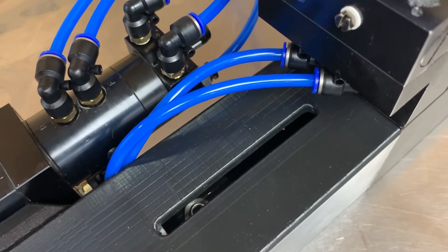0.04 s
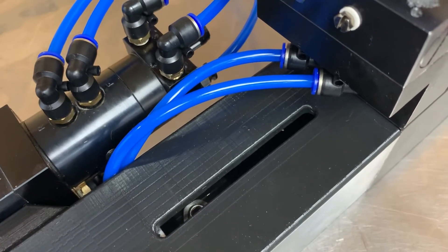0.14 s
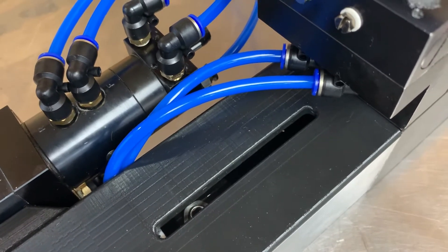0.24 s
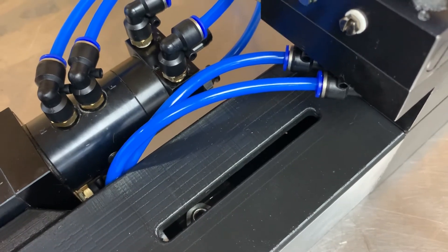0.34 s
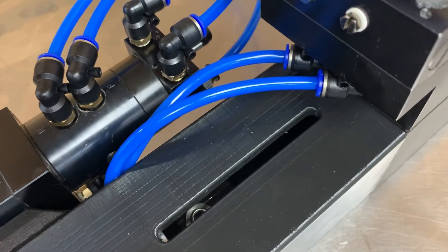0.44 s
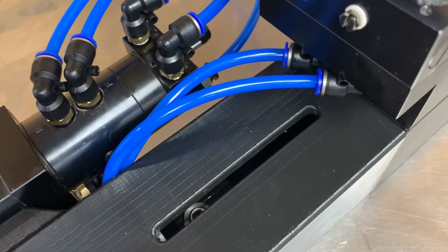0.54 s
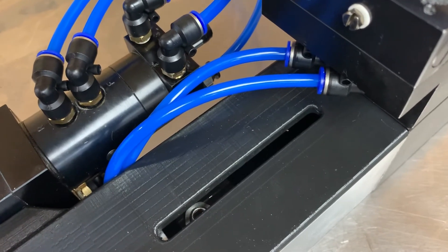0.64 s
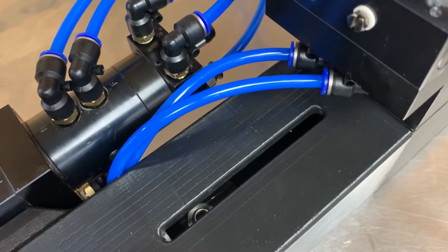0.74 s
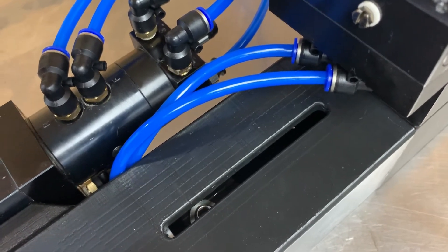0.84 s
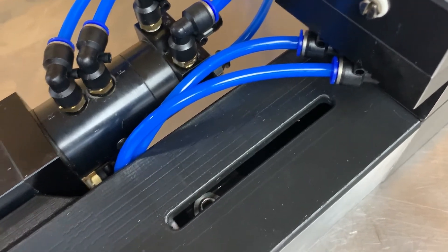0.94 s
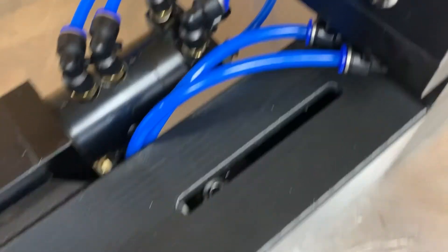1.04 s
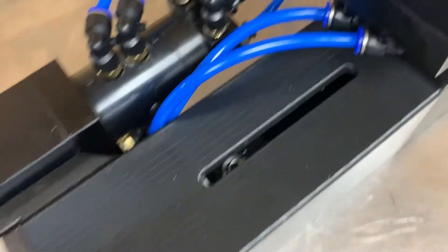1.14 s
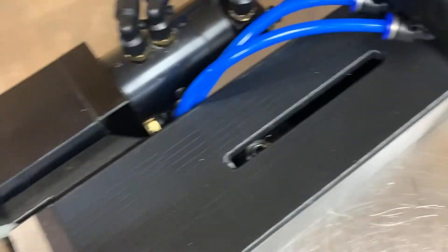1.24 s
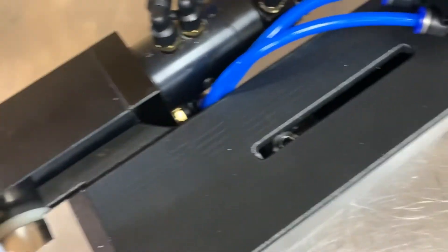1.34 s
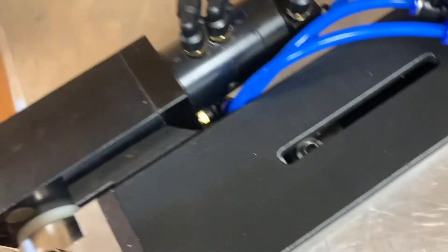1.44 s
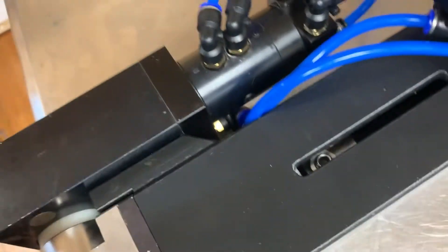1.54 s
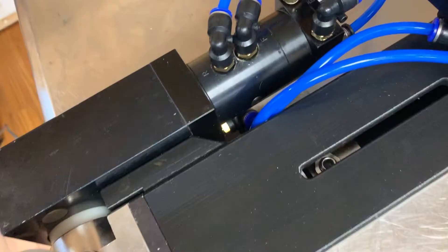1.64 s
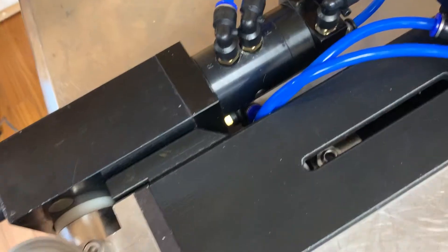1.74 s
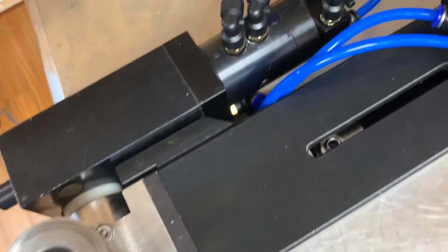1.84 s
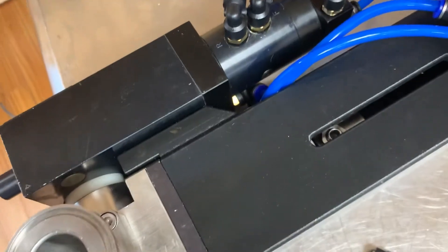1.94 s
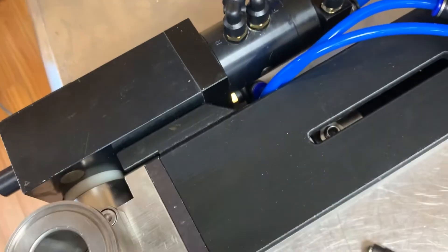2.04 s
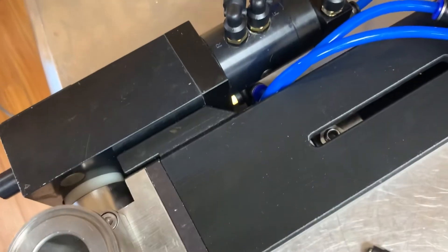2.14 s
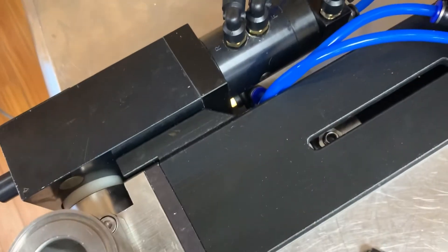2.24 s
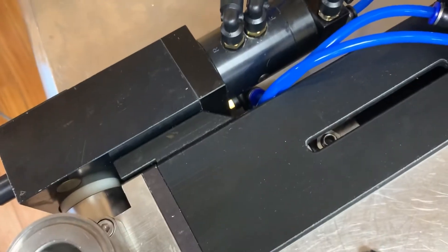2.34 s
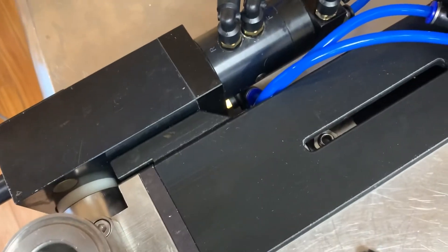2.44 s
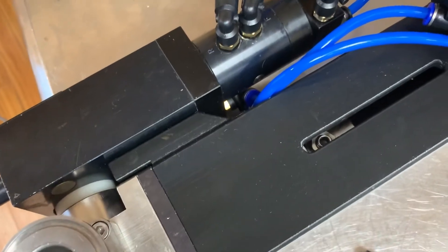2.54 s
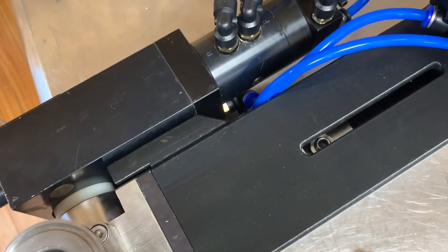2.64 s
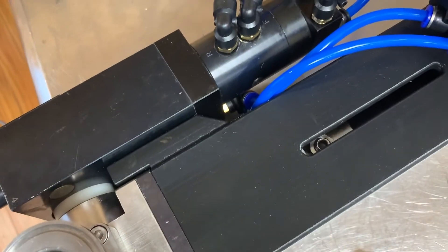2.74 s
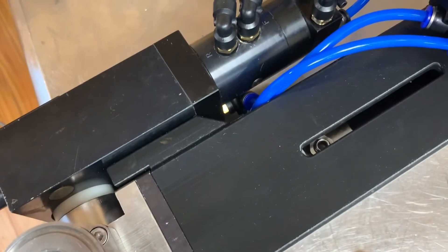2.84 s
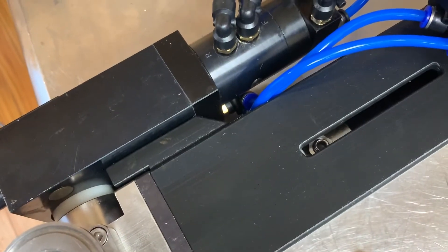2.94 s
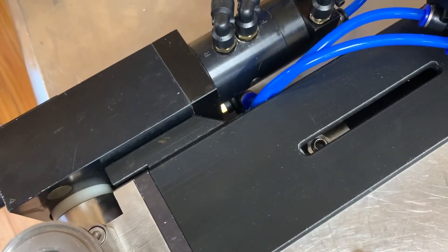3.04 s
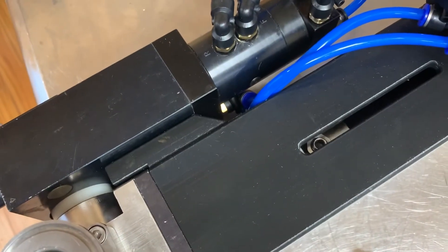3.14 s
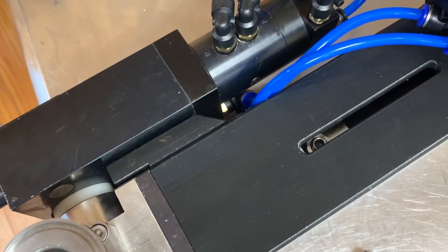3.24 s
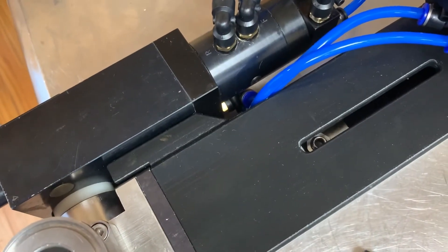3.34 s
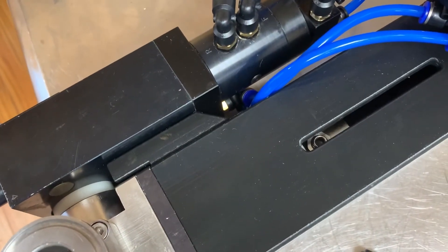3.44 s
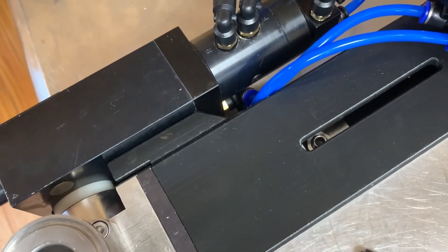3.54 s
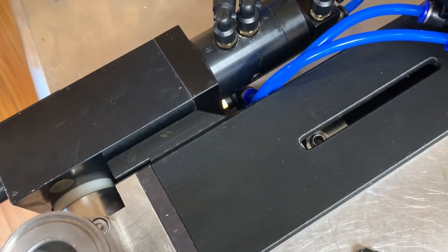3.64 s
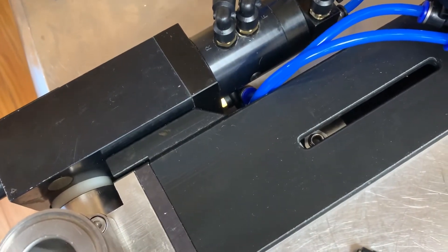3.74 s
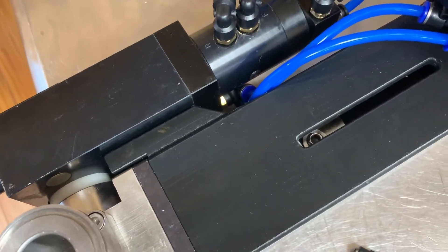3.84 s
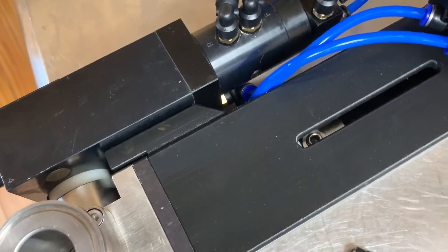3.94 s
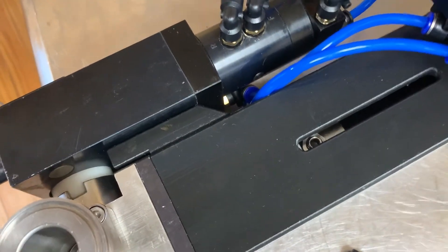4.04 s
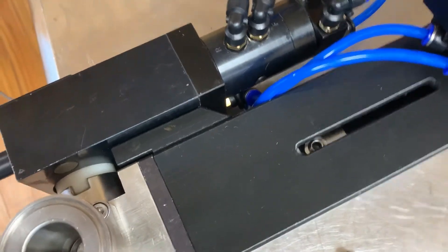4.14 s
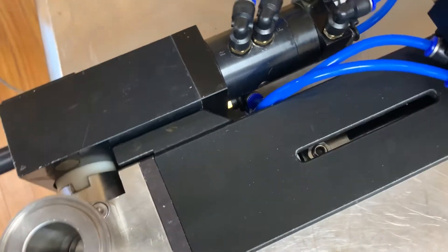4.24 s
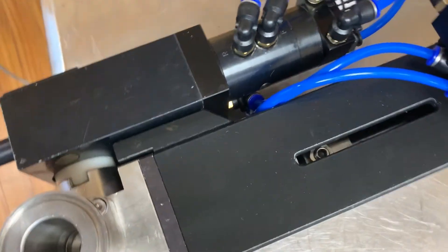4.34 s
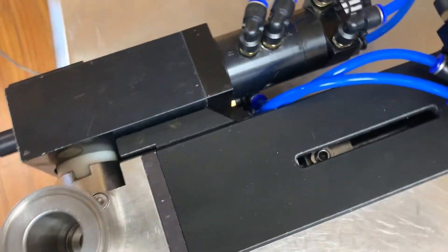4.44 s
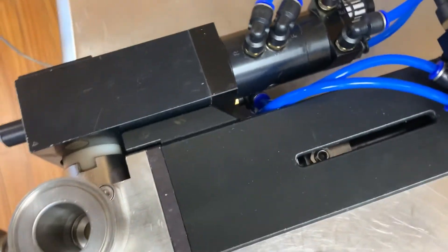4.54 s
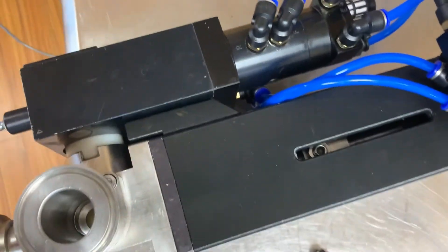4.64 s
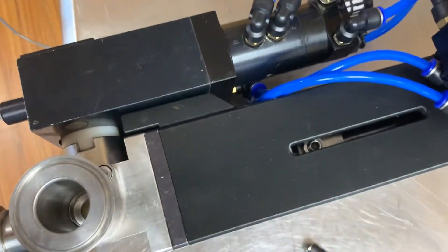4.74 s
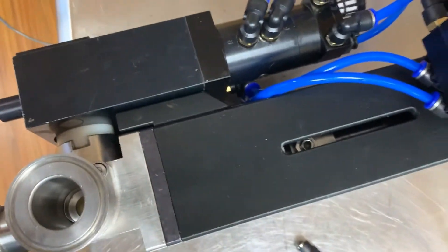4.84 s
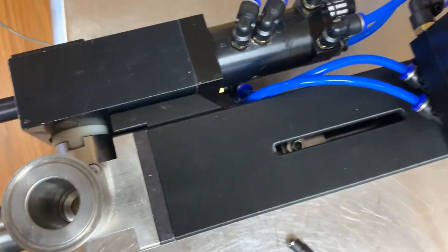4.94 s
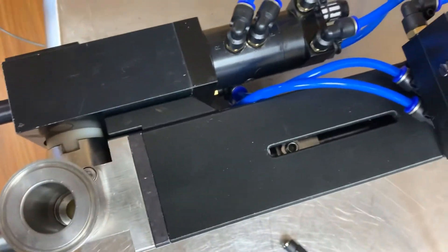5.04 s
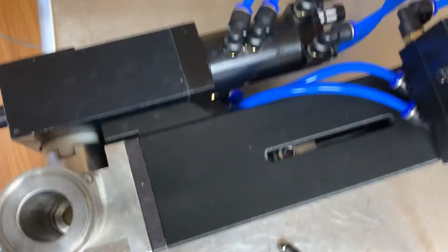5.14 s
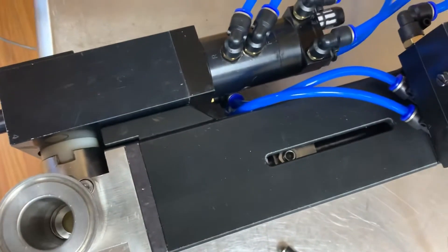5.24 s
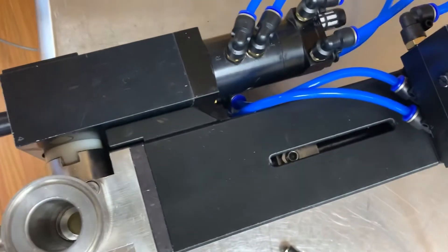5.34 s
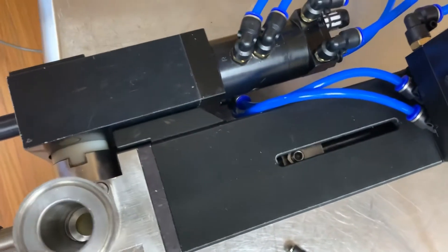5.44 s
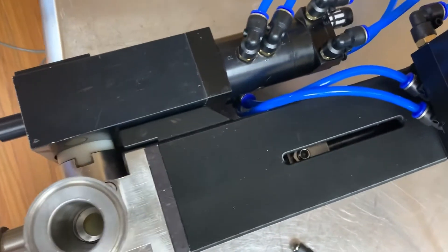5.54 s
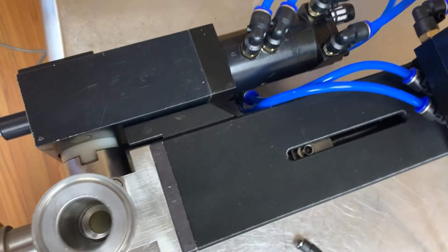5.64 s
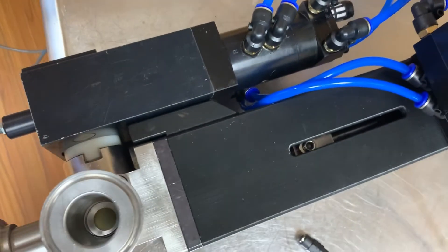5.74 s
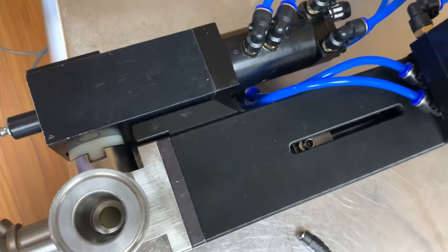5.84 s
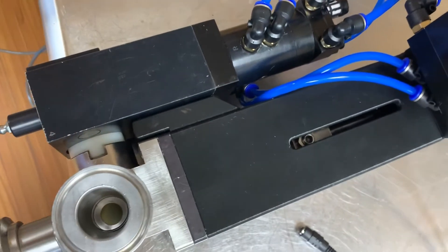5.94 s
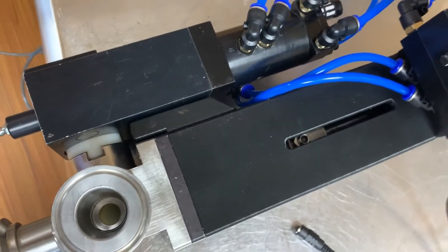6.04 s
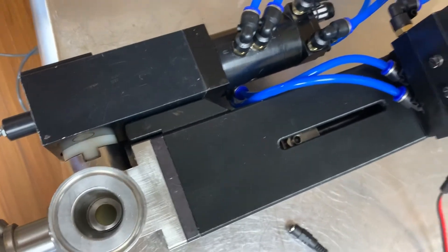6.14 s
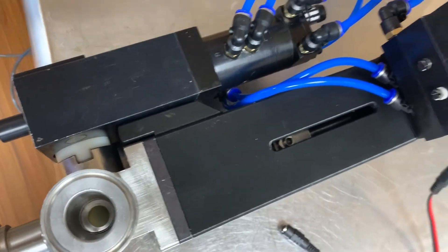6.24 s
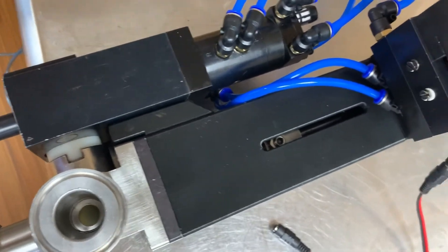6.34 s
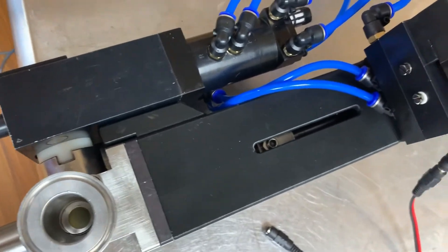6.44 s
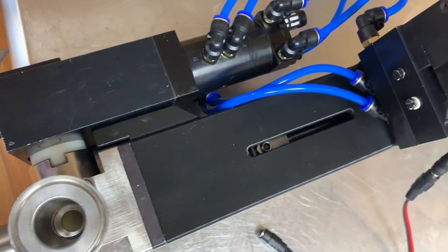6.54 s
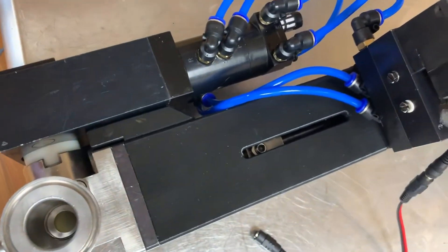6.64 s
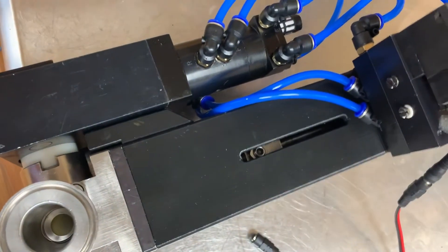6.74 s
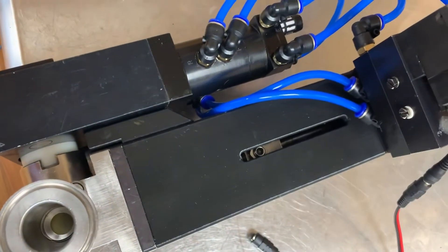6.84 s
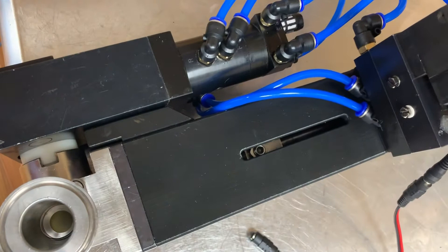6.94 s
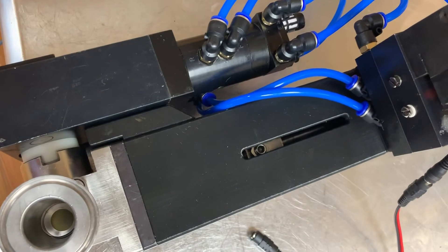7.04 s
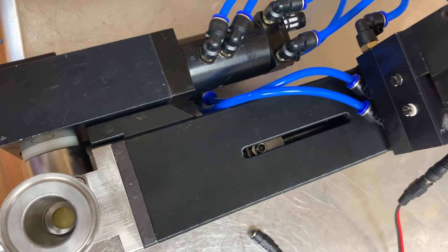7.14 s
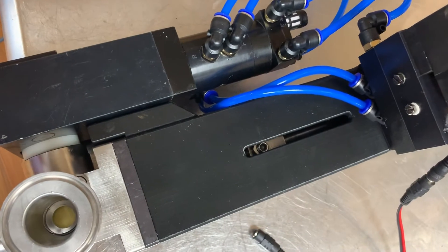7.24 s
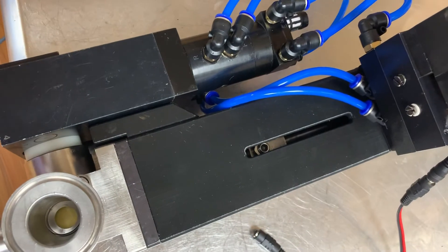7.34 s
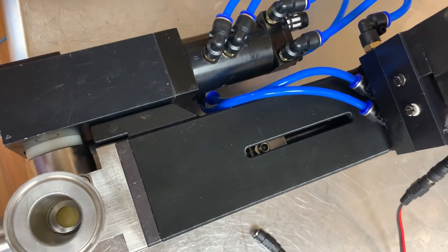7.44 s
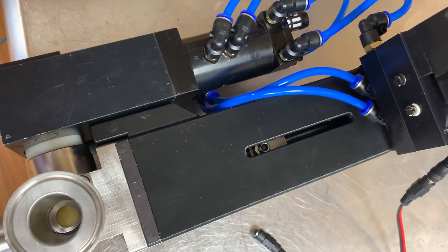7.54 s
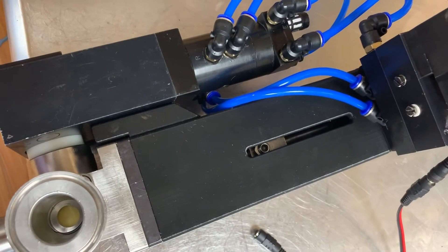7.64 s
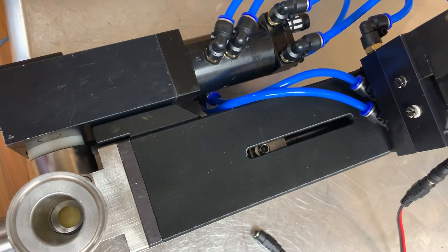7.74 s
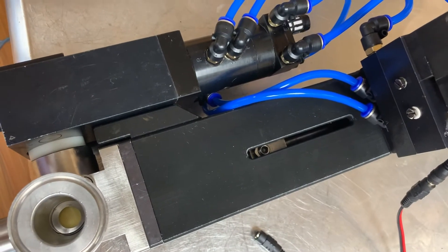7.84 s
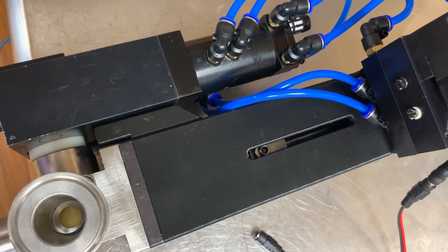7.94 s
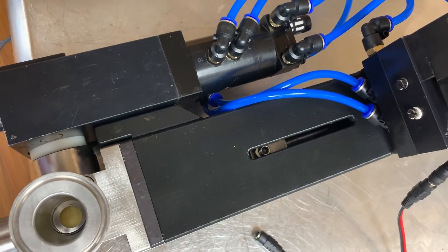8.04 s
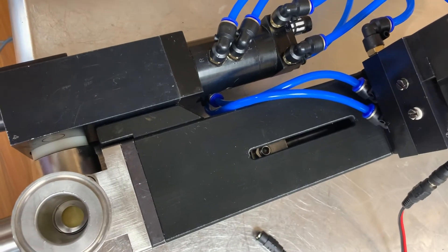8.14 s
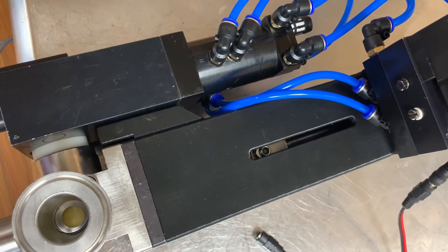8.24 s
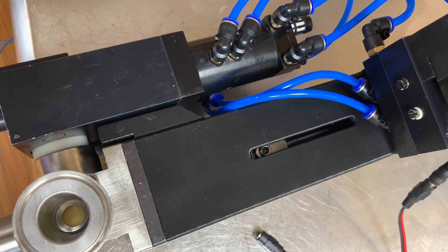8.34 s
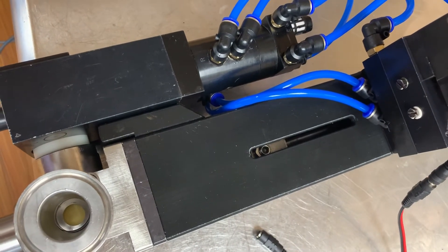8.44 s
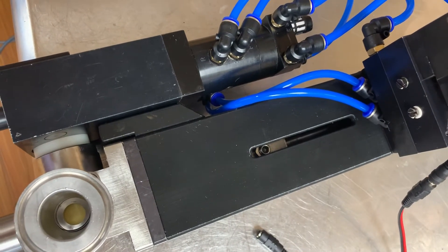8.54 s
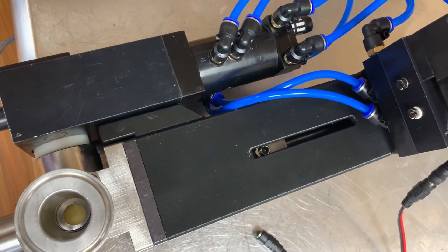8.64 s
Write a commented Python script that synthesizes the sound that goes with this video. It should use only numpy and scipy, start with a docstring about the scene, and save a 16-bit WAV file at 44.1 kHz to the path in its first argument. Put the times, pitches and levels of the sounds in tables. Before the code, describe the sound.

A pneumatic actuator switches three times with sharp double metal clacks and short air blasts, with bright leaking hiss and hollow exhaust between.

```python
"""Pneumatic actuator in a factory hall

An actuator on a filling machine switches stroke three times, over the low rumble of the hall.
Each switch is valve ticks, a blast of air noise and ringing, pitch-sweeping hits of spool and piston; knocks follow.
Between switches a fitting leaks a bright hiss of gliding noise, or the cylinder exhausts hollowly through tubing.
The microphone has two ports and draws back from close to far, which recolours the leak.
"""
import sys
import numpy as np
from scipy import signal
from scipy.fft import rfft, irfft, next_fast_len
from scipy.io import wavfile
from scipy.ndimage import map_coordinates

SR = 44100
rng = np.random.default_rng(int(sys.argv[2]) if len(sys.argv) > 2 else 0)


def volts_from_decibels(level):
    """Turn decibel levels (scalar or array-like) into linear amplitude factors."""
    exponent = np.asarray(level, float) / 20
    return 10 ** exponent


def materialize(psi):
    """Save the field psi as 16-bit PCM at rate SR to the path in sys.argv[1].

    A 1-D psi becomes a single channel; in a 2-D psi each row is a channel.
    """
    bounded = np.clip(np.atleast_2d(psi).T, -1, 1)
    quanta = np.round(bounded * 32767).astype(np.int16)
    wavfile.write(sys.argv[1], SR, quanta)


N = 383669
T = np.arange(N) / SR
SIZE = next_fast_len(N + SR)   # transform length, with room after the end
HZ = np.maximum(np.arange(SIZE // 2 + 1) * SR / SIZE, 1)

# phase between the microphone's two ports: (frequency [Hz], left leads by [rad])
PORT_LEAD = [(200, 0.5), (600, -0.75), (1050, -1), (1400, -3), (2500, -6), (3100, -2), (4000, -5),
             (5000, -4.5), (6200, -1.5), (9000, -0.5)]
# metal ticks and cracks: (time [s], bright splash [dB], low stop mode [dB], high stop mode [dB])
METAL_HITS = [(0.1755, -18, -33, -34), (0.1843, -8, -19, -13), (0.1898, -4, -14, -22),
              (0.2696, -11, -22, -26), (0.2801, -12, -33, -14), (3.9096, -3, -22, -22),
              (3.9118, -6, -14, -22), (3.9160, -8, -23, -18), (3.9842, -7, -26, -12),
              (7.0255, -12, -28, -26), (7.0312, -2.5, -15, -18), (7.1114, -7, -26, -31),
              (7.1420, -13, -24, -19)]
# knocks on the housing: (time [s], level [dB], place [0 front end - 1 rear end])
HOUSING_KNOCKS = [(.270, -18.5, 1), (0.5634, -35.5, 0.72), (4.3474, -14.5, 0.032), (7.112, -15.5, 0.95),
                  (7.547, -38, 0.77), (7.5543, -40, 1)]


def at_hz(points):
    """A table read along log frequency."""
    hz, value = np.transpose(points)
    return np.interp(np.log(HZ), np.log(hz), value)


def rms_one(x):
    """Scaled so that the average of the channels has rms 1."""
    mid = np.mean(np.atleast_2d(x), axis=0)
    return x / np.sqrt(np.mean(mid ** 2) + 1e-20)


def drift(rate):
    """Slow smooth chance with spread about 1, from 2 * rate random points a second."""
    count = int(N / SR * rate * 2) + 3
    return map_coordinates(rng.standard_normal(count), [T * rate * 2], order=3)


def bursts(rows, t60, rise_s):
    """Envelope of sudden events (time [s], level [dB]) that die away exponentially."""
    out, t = np.zeros(N), T[:int(2 * t60 * SR)]
    for s, db in rows:
        at = int(s * SR)
        out[at:at + len(t)] += volts_from_decibels(db - 60 * t / t60) * (1 - np.exp(-t / rise_s))
    return out


def ring(x, hz, t60):
    """A two-pole resonance: a unit click sets a dying sine of starting height 1 ringing."""
    r, w = volts_from_decibels(-60 / (t60 * SR)), 2 * np.pi * hz / SR
    return signal.lfilter([0, np.sin(w)], [1, -2 * r * np.cos(w), r * r], x + 1e-18)


def ports(shared, own=0, alike=1, lead=PORT_LEAD):
    """Sound at the two microphone ports from spectra, with phase lead and balance between them."""
    # (frequency [Hz], left minus right [dB])
    balance = [(60, -.2), (150, 1), (380, 1), (950, 0.2), (2380, 1), (5980, 3), (9000, 0)]
    lean = volts_from_decibels(at_hz(balance) / 2) * np.exp(.5j * at_hz(lead))
    pair = np.array([lean, 1 / lean])
    shared_power = abs(pair.mean(axis=0)) ** 2
    own_power = (abs(pair) ** 2).sum(axis=0) / 4
    # dividing by the sum's gain evens its colour; 0.31 limits the boost where the ports cancel
    mid = np.sqrt(alike * shared_power + (1 - alike) * own_power + 0.31)
    mixed = np.sqrt(alike) * shared + np.sqrt(1 - alike) * own
    return irfft(pair / mid * mixed, SIZE)[:, :N]


def air(colour_db, likeness=1.0, lead=PORT_LEAD):
    """Coloured noise as heard at both ports, partly alike; a lower likeness exponent makes it more alike."""
    # (frequency [Hz], likeness of the ports [0-1])
    port_likeness = [(120, 1), (450, 0.9), (900, 1), (1600, 0.32), (2500, 0.18), (3500, 0.33), (5500, 0.4),
                     (7500, 1), (9500, 0.65), (11000, 1)]
    noise = rng.standard_normal((3, len(HZ))) + 1j * rng.standard_normal((3, len(HZ)))
    noise = volts_from_decibels(colour_db) * noise
    return rms_one(ports(noise[0], noise[1:], at_hz(port_likeness) ** likeness, lead))


def rumble():
    """The hall's distant low rumble: shaped noise with a gently drifting level."""
    # (frequency [Hz], relative level per Hz [dB])
    colour = [(15, -52), (25, -17.5), (66, -11), (87, 0), (104, -10), (128, -8), (165, -16), (221, -11.5),
              (306, -26), (438, -29), (1120, -33), (2270, -34), (3000, -43.5), (6600, -120)]
    return volts_from_decibels(-49 + 0.67 * drift(2.6)) * air(at_hz(colour))


def hall(x):
    """Diffuse echo off the hall: dying noise, longer in the bass, partly its own on each side."""
    # (band top [Hz], level [dB], t60 [s])
    echo_bands = [(1300, -21, 0.32), (15000, -13.5, 0.14)]
    t, tail = T[:SR // 2], 0
    for top_hz, db, t60 in echo_bands:
        lowpass = signal.butter(2, top_hz, fs=SR, output="sos")
        noise = signal.sosfilt(lowpass, rng.standard_normal((3, len(t))))
        noise = noise[0] + 0.64 * noise[1:]
        noise = noise * volts_from_decibels(-60 * t / t60) * (t > .004)   # no echo in the first 4 ms
        tail = tail + volts_from_decibels(db) * noise / np.sqrt(np.mean(np.sum(noise ** 2, axis=1)))
    return signal.fftconvolve(x[None], tail, axes=1)[:, :N]


def pressure():
    """Share of line pressure at the fitting: it fills and vents exponentially."""
    # the leaking fitting is under pressure: (from [s], to [s])
    pressurised = [(.31, 3.98), (7.12, 9)]
    fill_s, vent_s = 0.15, 0.084   # time constants
    share = 0
    for on, off in pressurised:
        filled = 1 - np.exp(-np.clip(T - on, 0, None) / fill_s)
        share = share + filled * np.exp(-np.clip(T - off, 0, None) / vent_s)
    return share


def leak():
    """A turbulent jet, filtered frame by frame so that its peaks and dips glide with the microphone."""
    # peaks and dips, relative level per Hz: (close [Hz], [dB], drawn back [Hz], [dB], far [Hz], [dB])
    colours = [(1150, -20.5, 480, -35, 1800, -44), (2230, -18, 2550, -18, 2100, -25),
               (2980, -23.5, 2920, -26.5, 2840, -20.5), (4220, -4, 3650, -10, 3630, -11),
               (4850, -14, 4700, -13, 3700, -19), (5800, -12.5, 4270, -17, 4700, -10.5),
               (6900, -18.5, 4900, -19.5, 4840, -23.5), (8560, 0.5, 5890, -6, 6700, -6),
               (10100, -3.5, 6940, -11.5, 7600, -12), (10800, -3, 7650, -6, 7500, -3.5),
               (11900, 4.5, 8300, -4.5, 8160, -0.5), (13200, -4, 10400, -5, 8200, -7.5),
               (13900, -6, 9300, 0, 9800, -5.5), (15300, -3, 9930, .5, 11100, -0.5),
               (16500, -6, 11050, -5.5, 12000, -3.5), (18300, -7, 11500, -1, 12900, -5.5),
               (20000, -7, 14700, -4, 13700, -4.5), (20700, -2, 13600, -3, 14300, -2.5),
               (21800, -8, 15000, -15, 15250, -9), (22000, -39, 15800, -4.5, 15700, -5.5)]
    # microphone distance: (time [s], place [0 close - 1 drawn back - 2 far])
    microphone = [(.85, 0), (1.0, .2), (1.15, .7), (1.4, .9), (1.7, 1), (3.95, 1), (4.4, 2)]
    # full leak heard at each distance: (close [dB], drawn back [dB], far [dB])
    distance_db = [-34, -38, -41]
    # (frequency [Hz], left leads by [rad])
    leak_lead = [(3100, -2.5), (5500, -0.5), (7750, -1.78), (10700, 0.22)]
    # colour of the seep: (frequency [Hz], relative level per Hz [dB])
    seep_colour = [(2500, -13), (5300, -9.5), (8200, -1.5), (10200, 1), (11400, -3.5), (13000, -5),
                   (15300, -1.5)]
    seep_db = -49   # the seep never stops
    hz, frames, jet = signal.stft(air(0, lead=leak_lead), SR, nperseg=1024)
    seep = air(at_hz(seep_colour), lead=leak_lead)
    table = np.reshape(colours, (-1, 3, 2))
    for k, where in enumerate(np.interp(frames, *np.transpose(microphone))):
        near = min(int(where), 1)
        points = table[:, near] + (where - near) * (table[:, near + 1] - table[:, near])
        gain = volts_from_decibels(np.interp(hz, np.sort(points[:, 0]), points[:, 1], left=-70))
        jet[..., k] *= gain / np.sqrt(np.mean(gain ** 2))
    full_db = np.interp(np.interp(T, *np.transpose(microphone)), [0, 1, 2], distance_db)
    level = pressure() * volts_from_decibels(full_db + 0.31 * drift(6.9) + 0.66 * drift(20.5))
    hiss = signal.istft(jet, SR, nperseg=1024)[1][:, :N]
    return level * hiss + volts_from_decibels(seep_db) * seep


def exhaust_db():
    """Flow holds at first, sags as the cylinder empties, and dies when the valve shuts."""
    # (open [s], shut [s], level when opened [dB])
    exhausts = [(0, .18, -45.5), (3.97, 7.03, -43)]
    emptying_db, emptying_s, shut_db_per_s = 14, 1.86, 76
    flow = 1e-5
    for start, end, db in exhausts:
        emptied = 1 - np.exp(-((T - start) / emptying_s) ** 2)
        fall_db = emptying_db * emptied + shut_db_per_s * np.clip(T - end, 0, None)
        flow = flow + (T >= start) * volts_from_decibels(db - fall_db)
    return 20 * np.log10(flow)


def exhaust(full_db=-46, dulling=0.46, hiss_dulling=0.68):
    """A hollow rush coloured by the resonances of the tubing; it loses treble as the flow slows."""
    # (frequency [Hz], relative level per Hz [dB])
    colour = [(150, -14), (250, -8), (346, -7), (502, -4), (1020, -1.5), (1370, -18), (1640, -9.5),
              (2410, -14), (3280, -11), (3990, -11), (5980, -17.5), (8000, -11), (14000, -17.5)]
    # resonances of the tubing: (frequency [Hz], width [Hz], boost or dip [dB])
    tubing = [(1710, 230, 7), (1980, 45, 13), (2155, 41, 9.5), (2388, 64, 12.5), (3840, 99, 9.5),
              (4380, 27, 14.5), (2570, 90, 6), (3230, 150, -4.5), (4070, 120, 9), (1850, 110, -12),
              (2250, 62, -7), (4285, 60, -9)]
    waver = .004   # share by which the resonances drift
    peaks_db = sum(db / (1 + (2 * (HZ - hz) / width) ** 2) for hz, width, db in tubing)
    level_db = exhaust_db() + .55 * drift(11.0)
    rush = air(at_hz(colour) + peaks_db)
    warped = np.arange(N) + waver * np.cumsum(drift(1.5))
    rush = np.array([np.interp(warped, np.arange(N), side, period=N) for side in rush])
    hollow = signal.sosfiltfilt(signal.butter(4, 1400, fs=SR, output="sos"), rush)
    hiss = signal.sosfiltfilt(signal.butter(4, 3300, "high", fs=SR, output="sos"), rush)
    middle = rush - hollow - hiss
    loss_db = level_db - full_db   # middle and hiss lose this share more than the hollow part
    return volts_from_decibels(level_db) * (hollow + volts_from_decibels(dulling * loss_db) * middle + volts_from_decibels(hiss_dulling * loss_db) * hiss)


def rattle():
    """The many small modes under each knock blur into a ragged puff; rod scuffs are duller and start softly."""
    # soft scuffs of the piston rod: (time [s], level [dB])
    scuff_times = [(.567, -38), (4.385, -31), (4.82, -33.5), (4.9, -35), (7.575, -41)]
    puff = air(at_hz([(150, -21), (400, -5), (1100, 4.0), (1600, -1.0), (2600, -8.5), (4500, -19), (7000, -60)]))
    scuff = air(at_hz([(120, -7), (300, -3), (700, -2.0), (1200, -26), (2500, -60)]), likeness=0.34)
    puff_rows = [(s, db - 9.5) for s, db, place in HOUSING_KNOCKS]
    puffs = bursts(puff_rows, t60=0.056, rise_s=0.00045) * puff
    return puffs + bursts(scuff_times, t60=0.16, rise_s=0.024) * scuff


def knocks():
    """Each knock strikes the housing modes with strengths set by where it lands; the low ones arrive last."""
    # (frequency [Hz], struck at front [dB], struck at rear [dB], t60 [s])
    housing = [(155, -17, -22, 0.09), (294, -19, -20, 0.07), (428, -11, -22, 0.07), (513, -9, -10, 0.1),
               (818, -14, -8, 0.04), (915, -14, -20, 0.05), (1092, 1, -6, 0.04), (1228, -13, 0, 0.085),
               (1275, -8, -12, .025), (1430, -17, -14, .03), (2080, -19, 0, 0.014), (2500, -4, -3, 0.014)]
    spread_s = 0.00226   # extra delay per unit of (1000 / Hz - 1), for modes below 1 kHz
    s, db, place = np.transpose(HOUSING_KNOCKS)
    out = np.zeros(N)
    chance_db = rng.normal(0, 1.2, (len(s), len(housing)))
    for k, (hz, front_db, rear_db, t60) in enumerate(housing):
        clicks = np.zeros(N)
        late = s + spread_s * max(1000 / hz - 1, 0)
        mode_db = front_db + place * (rear_db - front_db)
        clicks[(late * SR).astype(int)] = volts_from_decibels(db + mode_db + chance_db[:, k])
        out += ring(clicks, hz, t60) * (-1) ** k
    return signal.sosfilt(signal.butter(2, 4500.0, fs=SR, output="sos"), out)   # soft contact


def thumps(glide_s=0.00201, rise_s=0.0011):
    """Bending waves in the base plate: high pitches arrive first, so each thump sweeps down and sways the frame."""
    # (time [s], level [dB], start frequency [Hz])
    thump_times = [(0.1752, -19.5, 1340), (0.191, -6.5, 525), (0.2642, -8, 890), (.281, -12.5, 616),
                   (3.910, -10, 585), (3.9759, -3.5, 1030), (7.0326, -8, 573), (7.105, -6, 1010),
                   (7.142, -13.5, 795)]
    # sway of the machine frame: (frequency [Hz], level [dB], t60 [s])
    frame = [(114, -51.5, 0.065)]
    t60 = 0.038
    out, t = np.zeros(N), T[:int(2 * t60 * SR)]
    for s, db, hz in thump_times:
        at = int(s * SR)
        phase = 2 * np.pi * hz * glide_s * np.log(1 + t / glide_s)
        out[at:at + len(t)] -= volts_from_decibels(db - 60 * t / t60) * (1 - np.exp(-t / rise_s)) * np.sin(phase)
    return out + sum(volts_from_decibels(db) * ring(out, hz, sway_t60) for hz, db, sway_t60 in frame)


def clacks():
    """A rough strike, a burst of noise, rings the two modes of the end stops."""
    # (frequency [Hz], t60 [s])
    stop_modes = [(2200, 0.023), (4400, 0.011)]
    s, splash_db, *modes_db = np.transpose(METAL_HITS)
    out = np.zeros(N)
    for db, (hz, t60) in zip(modes_db, stop_modes):
        strike = bursts(zip(s, db - 8), t60=0.0067, rise_s=0.00017) * rng.standard_normal(N)
        out += ring(strike, hz, t60)
    return out


def cracks():
    """Metal on metal: a bright splash of noise a few milliseconds long."""
    colour = [(2500, -1.5), (5500, -0.5), (9000, 1.0), (13000, -6.0), (16000, -6.0)]   # (Hz, dB per Hz)
    splash = air(at_hz(colour), likeness=0.36)
    s, splash_db, *modes_db = np.transpose(METAL_HITS)
    return bursts(zip(s, splash_db), t60=0.014, rise_s=0.00056) * splash


def blasts(fall_s=0.013, creep_s=0.024, creep_db=-19):
    """Full line pressure vents abruptly, sags, and is shut off when the spool lands."""
    # air blast while the spool travels: (start [s], end [s], level [dB], share of second colour [0-1])
    blast_times = [(0.182, 0.277, -22, 0.2), (3.9077, 3.99, -19.5, 0.9), (7.029, 7.112, -20, 0.03)]
    # two colours, open and tubing, each: (frequency [Hz], relative level per Hz [dB])
    colours = [
        [(35, -35), (60, 7.5), (164, -6.5), (346, -8), (1010, -7), (1660, -13), (2000, -4), (3000, -4),
         (3670, -9), (5400, -11), (7200, -6), (9000, -7.5), (16000, -21.5)],
        [(60, 5.5), (346, -13.5), (749, -2), (1200, -6.5), (1620, -11), (1820, -4.5), (2250, -8.5),
         (3670, -2.5), (6200, -14), (7500, -3.5), (9000, -8.5), (16000, -17)],
    ]
    sag_db_per_s = 60
    linger_db, linger_s = -19.5, 0.1   # air left in the valve body drains after shut-off
    open_air, tubing_air = [air(at_hz(c), likeness=0.88) for c in colours]
    out = 0
    for start, end, db, share in blast_times:
        shut = np.exp(-np.clip((T - end) / fall_s, 0, 50))
        linger = volts_from_decibels(linger_db) * np.exp(-np.clip((T - end) / linger_s, 0, 50))
        gate = np.clip((T - start) / 0.0019, 0, 1) * (shut + linger)
        # air creeps out as the spool lifts
        gate += volts_from_decibels(creep_db) * np.clip(1 + (T - start) / creep_s, 0, 1) * (T < start)
        mix = np.sqrt(1 - share) * open_air + np.sqrt(share) * tubing_air
        out = out + gate * volts_from_decibels(db - sag_db_per_s * np.clip(T - start, 0, 1)) * mix
    return out * volts_from_decibels(1.3 * drift(150.0))   # rough flutter of the level


def scene():
    """Machine events with their echo, the steady air, and the hall rumble."""
    solid = ports(rfft(thumps() + knocks() + clacks(), SIZE))
    events = blasts() + cracks() + rattle() + solid
    return events + hall(events.mean(axis=0)) + leak() + exhaust() + rumble()


def band_limit(x):
    """A steep low-pass at the top of the band."""
    return signal.sosfilt(signal.butter(12, 16830, fs=SR, output="sos"), x)


def record(dry):
    """The microphone signal has its peaks rounded, its highest treble made mono and its top cut."""
    stereo_top_hz, cutoff_hz = 11200, 15720
    left, right = 1.208 * np.tanh(dry / 1.177)
    side = signal.sosfiltfilt(signal.butter(5, stereo_top_hz, fs=SR, output="sos"), left - right)
    pair = np.array([left + right + side, left + right - side]) / 2
    # order 10, 0.3 dB ripple, 50 dB stop band
    top_cut = signal.ellip(10, .3, 50, cutoff_hz, fs=SR, output="sos")
    finished = signal.sosfilt(top_cut, pair)
    return band_limit(finished)


dry = scene()
out = record(dry)
materialize(out)
```